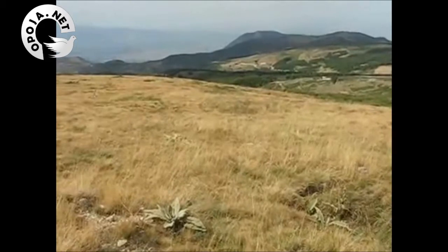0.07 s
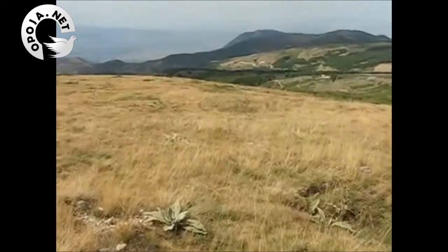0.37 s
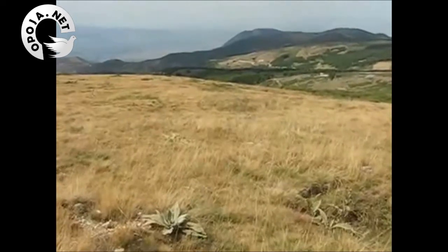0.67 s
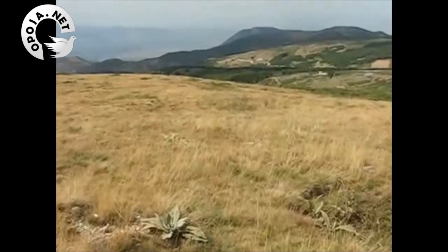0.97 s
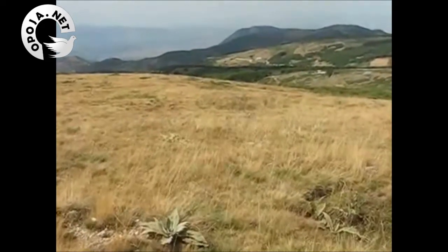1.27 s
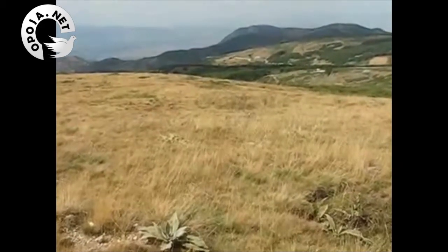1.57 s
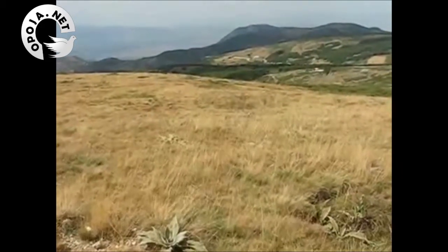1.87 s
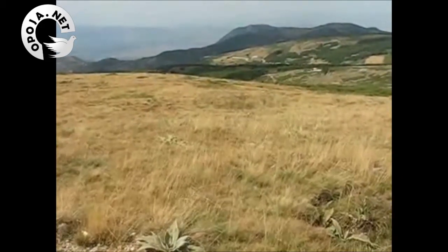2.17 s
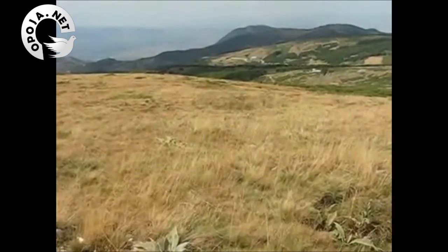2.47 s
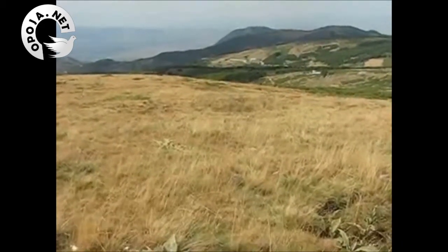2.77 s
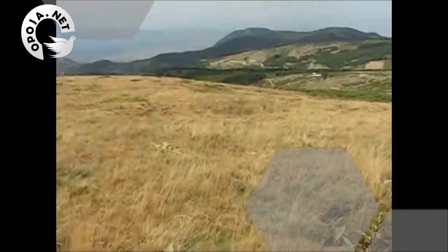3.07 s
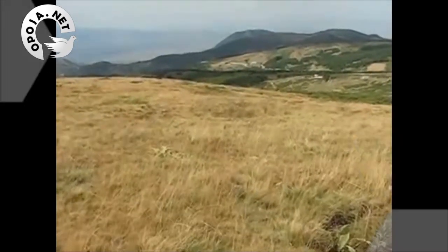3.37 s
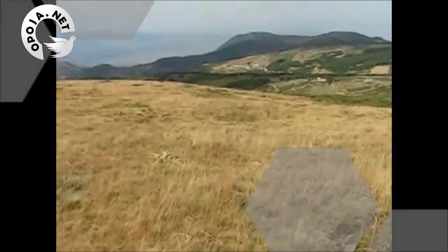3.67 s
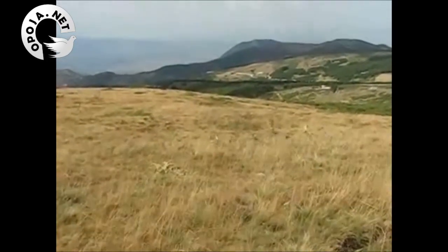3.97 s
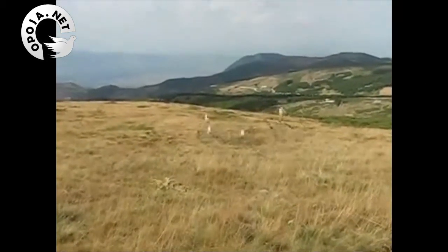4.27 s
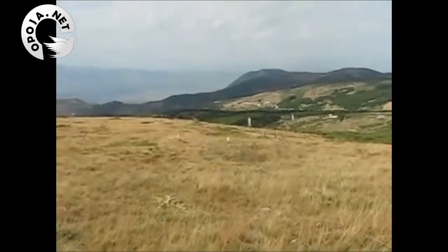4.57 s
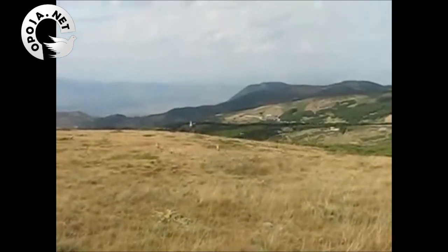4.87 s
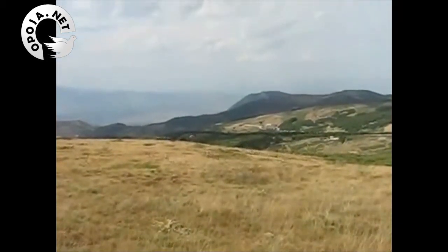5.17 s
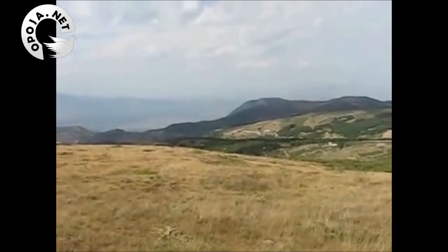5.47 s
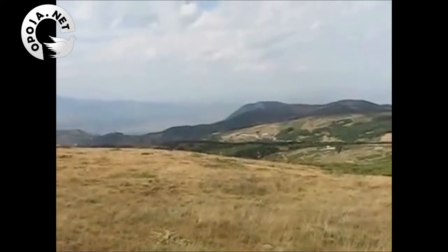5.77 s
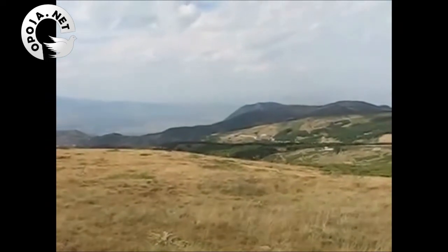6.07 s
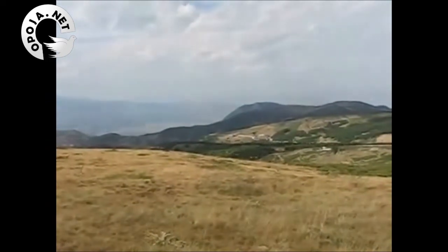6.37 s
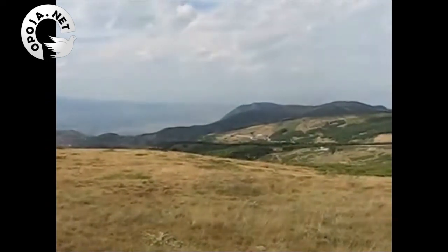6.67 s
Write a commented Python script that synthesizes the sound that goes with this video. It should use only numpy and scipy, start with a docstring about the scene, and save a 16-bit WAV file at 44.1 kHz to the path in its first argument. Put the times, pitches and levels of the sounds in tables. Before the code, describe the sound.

From the start, wind buffets the microphone in uneven low gusts, mostly on the left, with dull crackles and occasional soft thumps. Beneath it, dry grass ticks lightly and a small bird gives a few very faint, high lisps. At about 3.8 seconds several birds burst from the grass a few metres away. Dry stems crackle and snap, and fast wingbeats whirr, with a few light claps and one sharp, loud clap near 4.2 seconds. The wings fade by about 5 seconds as the birds fly off. From take-off until about 6.3 seconds they give a string of very short creaking calls mixed with high squeaky whistles, the clearest near 4.4 and 6.1 seconds. The wind thumps twice just before 5 seconds, then eases to a softer rumble that lasts until the end, near 7 seconds. The hillside sounds open, with almost no echo.

```python
"""Covey flushed on a windy hillside

A few metres from a hand-held camera, birds, probably partridges, burst from crackling dry grass and
fly off down the slope. Wings whirr and clap; short creaking calls break into whistles. Gusts buffet
the two microphone ports, a small bird lisps now and then, and the camera whines faintly."""
import sys
import numpy as np
from scipy import signal
from scipy.fft import rfft, irfft
from scipy.io import wavfile
from scipy.ndimage import uniform_filter1d

SR = 44100
rng = np.random.default_rng(int(sys.argv[2]) if len(sys.argv) > 2 else 0)


def master(y):
    """Save y as 16-bit WAV."""
    cut = np.clip(np.atleast_2d(y).T, -1, 1)
    pcm = np.round(cut * 32767)  # scale
    wavfile.write(sys.argv[1], SR, pcm.astype(np.int16))


N = 300762
TIME = np.arange(N) / SR

# Air rushing through feathers: freq_hz, gain_db
FEATHER_COLOUR = [(150, -0.5), (400, 0), (750, 5.5), (900, 2.5), (1130, 4), (1450, -3.5), (2000, 0),
                  (3000, -1.5), (4000, -7), (5500, -4.5), (7000, -11), (9000, -24.5), (12000, -58)]
# Each bird leaving the grass: start_s, wingbeats_per_s, relative_level_db
TAKE_OFFS = [(3.747, 18, -8), (3.865, 16, -7.5), (3.936, 19, -8.5), (3.991, 18, -15.5)]
def wings(stroke_share=0.25, upstroke_db=-5, rush_db=-8):
    """Each downstroke and weaker upstroke forces air through stiff feathers; birds beat out of step."""
    power = 0
    for start, beats_per_s, db in TAKE_OFFS:
        flying = TIME > start
        cycles = np.cumsum(flying * beats_per_s * (1 + 0.031 * walk(6))) / SR
        down, up = (np.exp(-(((cycles + lag) % 1 - .25) / (stroke_share / 2)) ** 2) for lag in (0, .5))
        power = power + flying * (undb(db) * (down + undb(upstroke_db) * up + undb(rush_db))) ** 2
    all_airborne = TIME > TAKE_OFFS[-1][0]
    beat = np.sqrt(power / np.mean(power[all_airborne]))
    rush = unit(colour(rng.standard_normal(N) * undb(0.91 * walk(700)), FEATHER_COLOUR))
    return rush * beat * flight()


def flight(flush_s=3.76, lift_s=0.14, start_m=3.1, speed_m_s=10, close_db=-42):
    """Wing gain at the microphone: it builds during lift-off, then fades as the covey flies away."""
    lift = np.sqrt(np.clip((TIME - flush_s) / lift_s, 0, 1))
    distance_m = start_m + speed_m_s * np.maximum(TIME - flush_s - lift_s, 0)
    return undb(close_db) * lift * start_m / distance_m


# Heaviest strokes of the birds nearest the microphone: time_s, level_db
DOWNSTROKES = [(3.874, -40), (3.927, -38), (3.956, -39), (3.993, -39), (4.005, -38.5), (4.035, -43),
               (4.077, -38), (4.13, -39), (4.177, -41.5), (4.191, -34.5), (4.238, -43), (4.285, -49),
               (4.308, -45), (4.624, -49), (4.896, -47)]
def downstrokes(half_width_s=.007, hollow_hz=1080, hollow_width_hz=380):
    """A cupped wing drives down: a brief feathery puff with a hollow ring."""
    push = sum(undb(db) * np.exp(-np.minimum(((TIME - time) / half_width_s) ** 2, 20))
               for time, db in DOWNSTROKES)
    air = unit(colour(rng.standard_normal(N), FEATHER_COLOUR))
    return push * unit(air + unit(ring(air, hollow_hz, hollow_width_hz)))


# Claps a few metres out, just after lift-off: start_s, peak_db
WING_CLAPS = [(3.955, -29), (4.006, -28), (4.021, -27), (4.188, -11.5), (4.234, -29)]
def claps(decay_s=0.00064, edge_db=-2):
    """Wing tips meet: a sharp edge and a short puff of air."""
    out = np.zeros(N)
    for start, db in WING_CLAPS:
        push = burst(decay_s)
        clap = colour(push, FEATHER_COLOUR) + undb(edge_db) * ring_twice(push, 1600, 3500)
        add(out, start, at_peak(clap, db))
    return out


# Alarm notes of the departing covey:
# start_s, length_s, level_db, top_click_rate_hz, lead_in_s, tail_s, throat_hz
CREAK_NOTES = [ (3.79, 0.017, -45, 1076, 0.0015, 0.0099, 3100),
               (3.805, 0.022, -46, 1170, 0.008, 0.00083, 3200),
               (3.867, 0.02, -40.5, 1100, 0.0055, 0.0084, 2420), (4.018, 0.0089, -44.5, 996, 0, 0, 3050),
               (4.128, 0.014, -38.5, 1120, 0.013, 0.0014, 3120),
               (4.142, .014, -39, 1183, .003, 0.023, 3500), (4.244, 0.0099, -38, 900, 0.01, 0.0093, 3240),
               (4.255, 0.0078, -36, 1130, 0.002, 0.0022, 3540), (4.4, 0.014, -36, 1137, .003, 0.0081, 3500),
               (4.549, 0.038, -39, 999, 0.012, 0.0039, 3400),
               (4.754, 0.022, -41.5, 1155, 0.012, 0.0089, 3160),
               (5.108, 0.011, -39.5, 1043, 0.0056, 0, 3270),
               (5.12, 0.0082, -42.5, 1037, 0.0072, 0.011, 3350),
               (5.158, 0.07, -44, 799, 0.027, 0.031, 3080), (5.262, 0.025, -50, 390, 0.0044, 0.03, 2760),
               (5.311, 0.047, -48.5, 1090, 0.044, 0.013, 2980),
               (5.483, 0.061, -42.5, 1225, 0.032, 0.018, 3750), (5.533, 0.03, -50.5, 412, 0, .01, 3280),
               (5.567, 0.046, -50.5, 409, 0.014, 0.0044, 3830), (5.614, 0.036, -45.5, 1200, 0.03, 0, 3300),
               (5.715, 0.096, -43.5, 1190, 0.027, 0.032, 3540), (5.833, 0.045, -45.5, 1180, 0.035, 0, 3634),
               (6.072, 0.031, -39, 1232, .015, .002, 4570), (6.114, .04, -43.5, 880, .005, .022, 3770),
               (6.177, 0.018, -52, 406, 0, 0.0031, 4340), (6.22, 0.029, -41, 1214, 0.016, 0.0024, 4030)]
def calls(duck_db=-7):
    """Creaking notes that give way wherever the voice flips into a whistle."""
    creaks = np.zeros(N)
    for start, length, db, top_hz, lead_s, tail_s, throat_hz in CREAK_NOTES:
        pressure = pressure_arch(length, lead_s, tail_s)
        add(creaks, start, undb(db) * creak(pressure, top_hz, throat_hz, lead_s))
    squeaks, whistling = whistles()
    return creaks * undb(duck_db * whistling) + squeaks


def pressure_arch(length, lead_s, tail_s, slide_s=0.017, sag_per_s=1.6):
    """Air pressure through a note, 0-1: slack, a quick slide up, a sagging hold, a slide back."""
    t = TIME[:int(length * SR)]
    held = 1 - sag_per_s * np.maximum(t - lead_s, 0)
    return held * np.clip(1 + np.minimum(t - lead_s, length - tail_s - t) / slide_s, 0, 1)


BREAK_S = .006  # time scale of the voice breaking at the top of a note
def syrinx(pressure, top_hz, lead_s, slack_hz=362.4, jitter=0.15, rasp_db=4, hiss_db=-1,
           effort_db_per_octave=5, tiring_db_per_s=70, attack_s=.008):
    """The syrinx clicks faster and harder as the pressure rises; returns the clicks and their rate."""
    size = len(pressure)
    t = TIME[:size]
    rate_hz = slack_hz * (top_hz / slack_hz) ** pressure
    # slow clicks are rougher, and the voice rasps as it reaches its top
    rough = np.interp(rate_hz, [slack_hz, 1100], [0.48, 0.13])
    rough += .38 * (1 - slack_hz / top_hz) * np.exp(-((t - lead_s) / BREAK_S) ** 2)
    wobble, shimmer = (unit(uniform_filter1d(rng.standard_normal(size), 40)) for _ in range(2))
    phase = 2 * np.pi * np.cumsum(rate_hz * (1 + jitter * rough * wobble)) / SR
    pulses = unit(sum(np.cos(k * phase) * (k * rate_hz < 10000) for k in range(1, 30)))
    limp = 1 + rough * np.cos(phase / 2) / 2  # strong and weak clicks alternate
    clicks = pulses * limp * undb(rasp_db * rough * shimmer)
    hiss = rough * undb(hiss_db) * (1 + np.cos(phase)) * rng.standard_normal(size)
    envelope = rounded(size, .4) * (1 - .75 * np.exp(-t / attack_s))
    effort_db = effort_db_per_octave * np.log2(rate_hz / rate_hz.mean()) - tiring_db_per_s * t
    return (clicks + hiss) * envelope * undb(effort_db), rate_hz


# Steady resonances of throat and beak: freq_hz, width_hz, gain_db
BEAK_MODES = [(2380, 400, -3), (3400, 600, -9), (4450, 700, -13), (5050, 700, -6.5)]
def creak(pressure, top_hz, throat_hz, lead_s, throat_rise=0.17, croak_hz=1100, held_beak_db=-7.5):
    """Each click of the syrinx rings the beak and a throat that tightens with the pressure."""
    clicks, rate_hz = syrinx(pressure, top_hz, lead_s)
    size, ring_out = len(clicks), (0, SR // 100)
    # slow clicks come with a nearly closed beak, which muffles them and adds a low hollow croak
    closed = np.clip((800 - rate_hz) / 400, 0, 1)
    opened, shut = (np.pad(clicks * share, ring_out) for share in (1 - 0.5 * closed, closed))
    # once the note is held, the beak resonances give way to the throat
    held = np.pad(pressure * np.clip((TIME[:size] - lead_s) / BREAK_S, 0, 1), ring_out)
    beak_drive = opened * undb(held_beak_db * held)
    beak = sum(undb(db) * ring(beak_drive, hz, width) for hz, width, db in BEAK_MODES)
    centre_hz = np.pad(throat_hz * (1 + throat_rise * (pressure - pressure.mean())), ring_out, "edge")
    throat = glide_ring(opened - 0.067 * shut, centre_hz, width_hz=1000)
    bright = butterworth(throat + beak, 3, [1900, 5500], "band")
    croak = ring_twice(shut, croak_hz, width_hz=330)
    croak_db = -10 * np.log2(throat_hz / 3000)  # a higher throat leaves less croak
    voice = unit(bright) + undb(croak_db) * closed.mean() * unit(croak)
    return voice / np.sqrt(np.sum(voice ** 2) / size)


# A whistle scoops up and, if long enough, sinks: elapsed_s, pitch_ratio
WHISTLE_ARCH = [(0, 0.97), (.012, 1.005), (.034, .975)]
# Squeaks among the covey's calls: start_s, length_s, level_db, pitch_hz, overtone_db
WHISTLE_NOTES = [(3.826, 0.011, -43.5, 3260, -24), (3.882, .01, -41, 2310, -16),
                 (4.152, 0.0053, -36, 3680, -8), (4.415, 0.013, -28, 4404, -34),
                 (4.567, 0.015, -36.5, 4240, -36), (5.176, 0.035, -50.5, 4400, -31),
                 (5.352, 0.0093, -50.5, 4520, -36), (5.525, 0.0079, -41, 4210, -37),
                 (5.644, 0.011, -52, 4440, -38), (5.853, 0.01, -44.5, 2364, -10),
                 (5.863, 0.0074, -61, 3630, -34), (6.09, .034, -34.5, 4360, -44),
                 (6.235, 0.009, -37, 2450, 4)]
def whistles(breath_db=-11, breath_width_hz=900):
    """The voice breaks into wavering, breathy tones; returns them and an envelope of when they sound."""
    out, whistling = np.zeros((2, N))
    for start, length, db, hz, overtone_db in WHISTLE_NOTES:
        size = int(length * SR)
        waver = 0.017 * unit(uniform_filter1d(rng.standard_normal(size), 60))
        bend = np.interp(TIME[:size], *np.transpose(WHISTLE_ARCH))
        phase = 2 * np.pi * np.cumsum(hz * (bend + waver)) / SR
        tone = unit(np.sin(phase) + undb(overtone_db) * np.sin(2 * phase))
        breath = undb(breath_db) * hoarse(phase, breath_width_hz)
        envelope = rounded(size, 0.15)
        add(out, start, undb(db) * unit(tone + breath) * envelope)
        add(whistling, start, envelope / envelope.max())
    return out, whistling


# Dry stems cracking: freq_hz, gain_db
STEM_COLOUR = [(500, -11), (1500, 0), (2700, 2), (3900, 4.5), (5500, 4), (7500, -4.5), (9000, -11.5),
               (10500, -13.5), (13000, -20.5)]
# Grass on the slope, stirring, then thrashed by the birds: start_s, length_s, level_db
GRASS_RUSTLES = [(.03, 0.061, -61), (.7, 0.2, -71.5), (.99, 0.1, -63), (1.13, 0.17, -68),
                 (1.58, 0.5, -64.5), (2.16, 0.25, -67.5), (2.53, .14, -66), (2.85, 0.071, -63.5),
                 (3.24, 0.022, -66.5), (3.55, 0.13, -67.5), (3.79, 0.088, -58), (3.91, 0.074, -43),
                 (4.0, 0.078, -54), (4.125, 0.039, -50), (4.31, 0.037, -50.5), (4.4, 0.47, -58.5),
                 (4.9, 0.62, -64)]
# Single stems breaking: start_s, peak_db
STEM_SNAPS = [(0.06, -43.5), (0.082, -48), (0.708, -45.5), (0.837, -45.5), (1.255, -42), (1.714, -49),
              (1.778, -46), (2.044, -42.5), (2.074, -43), (2.168, -41), (2.176, -44), (2.215, -40.5),
              (2.737, -44), (3.476, -49), (3.796, -29.5), (3.819, -29.5), (3.853, -28.5), (3.904, -32),
              (4.0041, -24), (4.078, -30.5), (4.127, -29), (4.193, -34), (4.329, -36)]
def grass(dense_per_s=2200, sparse_per_s=330, sparse_db=-3, snap_s=0.0025):
    """Dense tiny cracks of dry stems, sparser crisp ticks among them, and a few that snap loudly."""
    level_db = swells(GRASS_RUSTLES, attack_s=0.029, release_s=0.01, floor_db=-73.5)
    dense, sparse = (unit(colour(ticks(rate), STEM_COLOUR)) for rate in (dense_per_s, sparse_per_s))
    out = unit(dense + undb(sparse_db) * sparse) * undb(level_db + 2 * walk(60))
    for start, db in STEM_SNAPS:
        add(out, start, at_peak(colour(burst(snap_s), STEM_COLOUR), db))
    return out


def wind(ceiling=0.28, cutoff_hz=2100):
    """Eddies on each port, their pressure levelling off in hard gusts, over a distant hiss and sigh."""
    distant = still_air() + sigh()
    pressure = np.array([buffet(0), buffet(1)])
    rumble = butterworth(ceiling * np.tanh(pressure / ceiling), 4, cutoff_hz, "low")
    return rumble + gust_crackle() + slaps() + thumps() + distant


# Breeze at the microphone, dying down: time_s, left_db, right_db
PORT_BREEZE = [(0, -22.5, -31.5), (.33, -31, -35), (.62, -32, -37.5), (1.0, -28.5, -38.5),
               (1.17, -35, -38.5), (1.66, -36, -37), (2.17, -32, -36), (2.5, -29, -36), (3.1, -31.5, -38.5),
               (3.37, -37.5, -40), (4.25, -34.5, -34), (4.68, -40, -46), (5.0, -34, -34.5),
               (5.352, -40.5, -52.5), (6.1, -43, -56), (6.82, -42, -46.5)]
# Gusts on the microphone, mostly from the left: start_s, length_s, left_db, right_db
PORT_GUSTS = [ (0.048, 0.17, -24, -50), (0.398, 0.081, -24, -43), (0.71, 0.045, -27, -39),
              (0.865, 0.064, -25.5, -51), (1.246, 0.032, -26, -45), (1.391, 0.077, -22.5, -36.5),
              (1.497, 0.083, -25.5, -41), (1.74, 0.052, -25, -36), (1.825, 0.086, -24.5, -40.5),
              (1.969, 0.12, -20.5, -36), (2.261, 0.031, -28.5, -43), (2.332, 0.095, -22.5, -35),
              (2.632, 0.03, -27.5, -48), (2.748, 0.016, -26, -52), (2.807, 0.016, -25, -41),
              (2.924, 0.099, -29.5, -36.5), (3.424, 0.044, -25, -40), (3.5, .12, -25.5, -35),
              (3.662, 0.25, -29, -34.5), (3.941, 0.075, -24.5, -29), (4.052, 0.15, -27, -32),
              (4.292, 0.168, -29, -40), (4.478, 0.035, -50, -35), (4.592, 0.018, -32.5, -51),
              (4.75, 0.055, -29, -38), (4.866, 0.11, -31, -32), (5.102, 0.11, -30.5, -38),
              (5.409, 0.11, -38, -51), (5.841, 0.14, -38.5, -42), (6.217, 0.026, -43.5, -54),
              (6.43, 0.22, -39.5, -42.5), (6.564, 0.025, -29.5, -46)]
def wind_strength(port):
    """Gusts on top of the breeze at one port (0 left, 1 right), in dB."""
    times, *breeze_db = np.transpose(PORT_BREEZE)
    gusts = [(start, length, levels[port]) for start, length, *levels in PORT_GUSTS]
    return swells(gusts, attack_s=0.011, release_s=0.019, floor_db=np.interp(TIME, times, breeze_db[port]))


# Rumble on the microphone in a usual gust: freq_hz, left_db_per_hz, right_db_per_hz, growth_db_per_db
BUFFET_BANDS = [(22.2, -60, -57, 0.44), (51.7, -51, -48, 0.54), (115, -48, -47, 0.8747),
                (191, -51, -55.5, 1.0), (391, -62.5, -68, 1.4165), (827, -83.5, -80, 1.88),
                (1460, -99, -99, 1.5), (2540, -108, -112, 1.6)]
def buffet(port, usual_gust_db=-30, eddy_db=1.6, eddies_per_s=170, flicker_db=.6):
    """Turbulence on one port: stronger gusts shed smaller eddies; the rumble brightens and flutters."""
    hz, *port_db, growths = np.transpose(BUFFET_BANDS)
    gust_db = wind_strength(port) - usual_gust_db + eddy_db * walk(eddies_per_s)
    spectrum = rfft(rng.standard_normal(N)) * undb(on_log_axis(hz, port_db[port])) * np.sqrt(SR / 2)
    out = 0
    for share, growth in zip(np.eye(len(hz)), growths):
        band = irfft(spectrum * on_log_axis(hz, share), N)
        out = out + band * undb(growth * (gust_db + flicker_db * walk(40)))
    return butterworth(out, 2, 17, "high")


# Hard gusts on the windward port: freq_hz, gain_db
WINDWARD_COLOUR = [(100, -12.5), (350, 8), (700, -1), (1200, -9), (1700, -20), (2300, -32.5), (4000, -58)]
def gust_crackle(eddies_per_s=600, hard_gust_db=-22, growth=1.63):
    """Hard gusts tear a dense stream of tiny eddies off the left port, each a dull tick."""
    level_db = -38 + growth * np.minimum(wind_strength(0) - hard_gust_db, 2)
    left = unit(colour(ticks(eddies_per_s), WINDWARD_COLOUR)) * undb(level_db)
    return np.array([left, np.zeros(N)])


# One eddy against the microphone: freq_hz, gain_db
EDDY_COLOUR = [(40, -7.5), (150, 4), (400, -3.5), (800, -5), (1600, -19), (2500, -39.5), (5000, -75.5)]
# Eddies striking it: start_s, peak_db, left_minus_right_db
EDDY_SLAPS = [(0.05, -25, 6), (0.075, -21.5, 13), (0.102, -25, 18), (0.128, -20, 12.5), (0.176, -24, 21),
              (0.212, -19, 27), (0.317, -38, 22), (0.403, -33, 22), (0.453, -43, 27), (0.466, -16.5, 28),
              (0.568, -24, 12), (0.789, -21, 24), (0.875, -19, 22), (1.054, -28.5, 12), (1.411, -24.5, 28),
              (1.454, -22.5, 26), (1.502, -23, 26), (1.915, -18.5, 26), (1.967, -22, 24),
              (2.023, -24.5, 15), (2.198, -27, 19), (2.517, -31, 20), (2.625, -28, 19), (4.609, -33, 10),
              (5.408, -39, 14)]
def slaps(decay_s=0.0031, rise_s=0.0015, lead_s=.01):
    """An eddy bursts right on a port: a short dull crackle."""
    out = np.zeros((2, N))
    t = np.maximum(TIME[:SR // 16] - lead_s, 0)
    envelope = np.exp(-t / decay_s) * (1 - np.exp(-t / rise_s))
    for start, db, pan_db in EDDY_SLAPS:
        slap = colour(rng.standard_normal(len(t)) * envelope, EDDY_COLOUR)
        for port, port_db in zip(out, (min(pan_db, 0), min(-pan_db, 0))):
            add(port, start - lead_s, at_peak(slap, db + port_db))
    return out


# Pushes of air on the microphone: time_s, half_width_s, left_peak_db, right_peak_db
AIR_THUMPS = [(1.258, 0.0035, -13, -22), (1.404, 0.0038, -21.5, -27), (3.432, 0.0022, -11, -26),
              (4.797, 0.0012, -14, -21), (4.895, 0.0014, -10.5, -15.5)]
def thumps():
    """A large eddy pushes on both ports at once: one rounded pulse with a rebound either side."""
    out = 0
    for time, half_width_s, left_db, right_db in AIR_THUMPS:
        offset_squared = np.minimum(((TIME - time) / half_width_s) ** 2, 20)
        out = out + undb([[left_db], [right_db]]) * (1 - offset_squared) * np.exp(-offset_squared)
    return out


# Wind in the grass further off: freq_hz, gain_db
FAR_GRASS_COLOUR = [(600, -8), (1300, -5.5), (1680, -2), (2000, -10.5), (3000, -26.5), (6000, -33)]
# Its swells: start_s, length_s, level_db
FAR_SIGHS = [(1.32, 0.38, -62), (2.55, 0.025, -55.5), (2.95, 0.1, -60.5), (3.58, 0.19, -59)]
def sigh():
    """Wind sighs through distant grass, partly alike at the two ports."""
    noise = rng.standard_normal((2, N)) + rng.standard_normal(N)
    level_db = swells(FAR_SIGHS, attack_s=0.021, release_s=0.032, floor_db=-66.5)
    return unit(colour(noise, FAR_GRASS_COLOUR)) * undb(level_db)


# A small bird, faint in the background: start_s, length_s, level_db
LISP_NOTES = [(0.353, 0.042, -77), (0.578, 0.042, -70), (1.566, 0.066, -59.5), (2.898, 0.057, -58),
              (4.685, 0.05, -56), (5.43, 0.032, -68), (6.109, 0.043, -58)]
def lisps(start_hz=6400, end_hz=7800, breath_width_hz=600):
    """A very high note, mostly breath, that rises and swells, then stops."""
    out = np.zeros(N)
    for start, length, db in LISP_NOTES:
        size = int(length * SR)
        phase = 2 * np.pi * np.cumsum(np.linspace(start_hz, end_hz, size)) / SR
        envelope = np.linspace(.25, 1, size) * rounded(size, 0.8)
        add(out, start, undb(db) * unit(hoarse(phase, breath_width_hz) * envelope))
    return out


# Ambience of the open hill: freq_hz, level_db_per_hz
AIR_SPECTRUM = [(200, -79.5), (700, -99.5), (1200, -97), (1700, -101.5), (2500, -105), (4000, -106.5),
                (5500, -105), (6600, -107), (8200, -107), (9500, -120), (12000, -135)]
def still_air():
    """A soft, wide hiss of air whose level drifts slightly."""
    return colour(rng.standard_normal((2, N)), AIR_SPECTRUM) * np.sqrt(SR / 2) * undb(0.33 * walk(2.1))


# The camera itself, right by the microphone: pitch_hz, level_db
WHINE_TONES = [(7853, -78.5), (7881, -82), (8251, -84.5), (8280, -89)]
def whine(hiss_db=-84, hiss_hz=7950, hiss_width_hz=350):
    """Close pairs of faint steady tones from the camera, with a narrow band of hiss."""
    tones = sum(undb(db) * np.sqrt(2) * np.sin(2 * np.pi * (hz * TIME + 0.38 * rng.random((2, 1))))
                for hz, db in WHINE_TONES)
    hiss = ring_twice(rng.standard_normal((2, N)), hiss_hz, hiss_width_hz)
    return tones + undb(hiss_db) * unit(hiss)


# How the two ports hear the slope: freq_hz, left_minus_right_db, left_lead_rad
PORT_RESPONSE = [(500, 1, 0), (1100, -.5, 0), (2000, -2, 0), (3200, -4, .1), (4300, 2.5, .55), (5300, 2, 0),
                 (6300, -1, -1.1), (7500, -5, .3), (9000, -7.5, .3)]
def hillside(x, grass_db, grass_s=.004, slope_db=-20, slope_s=0.035):
    """Open ground at each port: direct sound, quick scatter from the grass, a faint one off the slope."""
    t = TIME[:SR // 4]
    hz, *columns = np.transpose(PORT_RESPONSE)
    balance_db, lead_rad = (on_log_axis(hz, column) for column in columns)
    out = []
    for side in (1, -1):
        near, far = (rng.standard_normal(len(t)) * np.exp(-t / decay) for decay in (grass_s, slope_s))
        tail = undb(grass_db) * near / np.linalg.norm(near) + undb(slope_db) * far / np.linalg.norm(far)
        heard = rfft(x + signal.fftconvolve(x, tail)[:N])
        out.append(irfft(heard * undb(side * balance_db / 2) * np.exp(1j * side * lead_rad / 2), N))
    return np.array(out)


def undb(db):
    """Decibels to gain."""
    return 10 ** (np.asarray(db) / 20)


def unit(x):
    """Scale to rms 1."""
    return x / np.sqrt(np.mean(x ** 2) + 1e-18)


def at_peak(x, db):
    """Scale to a peak level."""
    return undb(db) * x / np.abs(x).max()


def add(track, start_s, sound):
    """Mix a sound into a track."""
    i = int(start_s * SR)
    track[i:i + len(sound)] += sound[:N - i]


def on_log_axis(hz, values, size=N):
    """Spread values over every bin of a spectrum, along log frequency."""
    return np.interp(np.log(np.fft.rfftfreq(size, 1 / SR) + 1), np.log(hz), values)


def colour(x, rows):
    """Filter by (freq_hz, gain_db) rows."""
    size = x.shape[-1]
    return irfft(rfft(x) * undb(on_log_axis(*np.transpose(rows), size)), size)


def butterworth(x, order, hz, kind):
    """Low-, high- or band-pass filter."""
    return signal.sosfilt(signal.butter(order, hz, kind, fs=SR, output="sos"), x)


def ring(x, hz, width_hz):
    """One resonance, gain 1 at its centre."""
    return signal.lfilter(*signal.iirpeak(hz, hz / width_hz, fs=SR), x)


def ring_twice(x, hz, width_hz):
    """A resonance with steeper skirts."""
    return ring(ring(x, hz, width_hz), hz, width_hz)


def glide_ring(x, hz, width_hz):
    """A steep resonance whose centre moves."""
    carrier = np.exp(2j * np.pi * np.cumsum(hz) / SR)
    pole = np.exp(-np.pi * width_hz / SR)
    return 2 * np.real(carrier * signal.lfilter([(1 - pole) ** 2], np.poly([pole, pole]), x / carrier))


def walk(per_s):
    """Random levels, held and smoothed twice; rms 1."""
    hold = int(SR / per_s)
    steps = np.repeat(rng.standard_normal(N // hold + 1), hold)
    return unit(uniform_filter1d(uniform_filter1d(steps, hold), hold)[:N])


def ticks(per_s):
    """Randomly timed impulses of either sign and varied size."""
    return (rng.random(N) < per_s / SR) * rng.choice([-1, 1], N) * (.5 + rng.random(N))


def burst(decay_s):
    """Noise that starts sharply and dies away."""
    return np.roll(rng.standard_normal(1024) * np.exp(-TIME[:1024] / decay_s), 20)


def hoarse(phase, width_hz):
    """Breathy noise in a band that follows a tone."""
    noise = rng.standard_normal(len(phase)) + 1j * rng.standard_normal(len(phase))
    return unit(np.real(butterworth(noise, 2, width_hz, "low") * np.exp(1j * phase)))


def rounded(size, edge_share):
    """Envelope of a note: flat with rounded ends, rms 1."""
    return unit(signal.windows.tukey(size, edge_share))


def swells(rows, attack_s, release_s, floor_db):
    """Level in dB of (start_s, length_s, level_db) events that rise, hold and die away over a floor."""
    power = undb(floor_db) ** 2
    for start, length, db in rows:
        fade = np.maximum(start - TIME, 0) / attack_s + np.maximum(TIME - start - length, 0) / release_s
        power = power + (undb(db) * np.exp(-np.minimum(fade, 20))) ** 2
    return 10 * np.log10(power)


def scene():
    """Grass and wings spread over the slope, claps and voices more compact; wind and whine up close."""
    flush = hillside(grass() + wings(), grass_db=-9.5)
    birds = hillside(downstrokes() + claps() + calls() + lisps(), grass_db=-13)
    return flush + birds + wind() + whine()


def record(dry, top_hz=13500):
    """The camera's treble falls away above 9 kHz and is then cut."""
    dull = colour(dry, [(8800, 0.5), (10500, -13.0), (13000, -15)])
    return signal.sosfilt(signal.ellip(8, .2, 70, top_hz, fs=SR, output="sos"), dull)


dry = scene()
out = record(dry)
master(out)
```